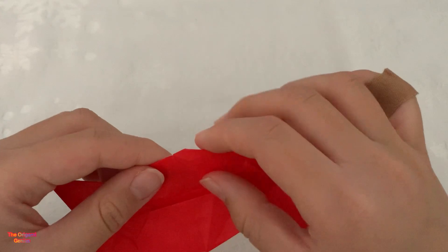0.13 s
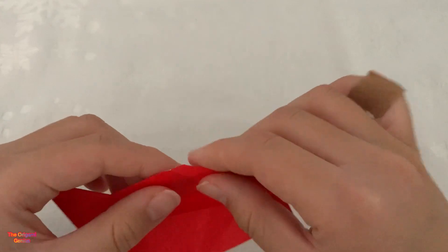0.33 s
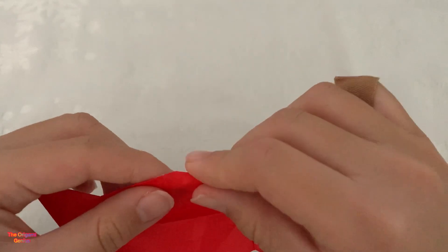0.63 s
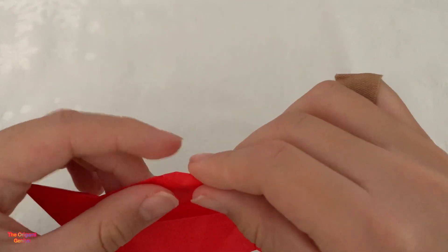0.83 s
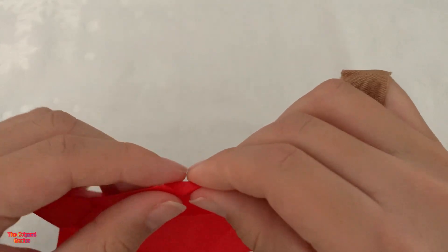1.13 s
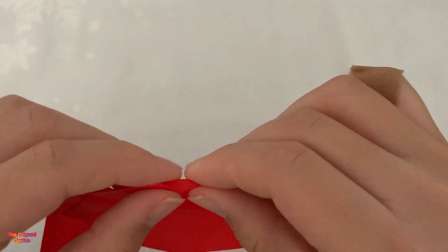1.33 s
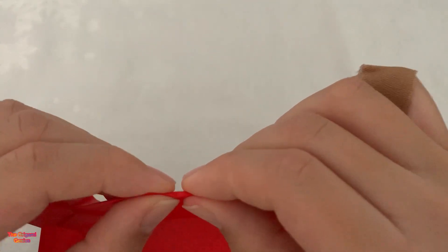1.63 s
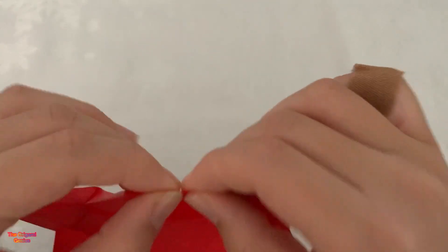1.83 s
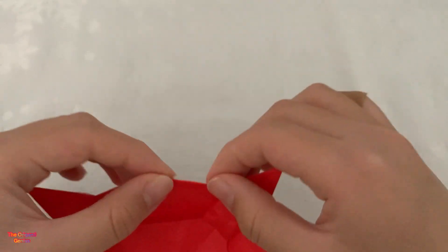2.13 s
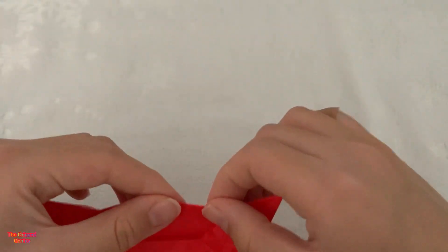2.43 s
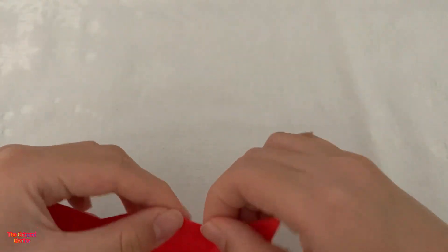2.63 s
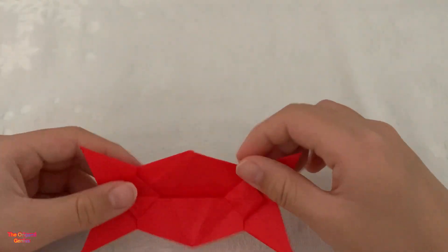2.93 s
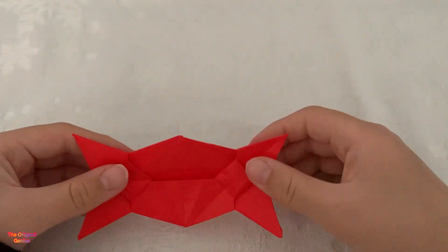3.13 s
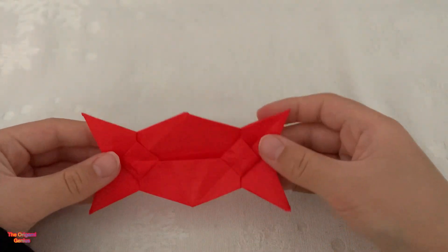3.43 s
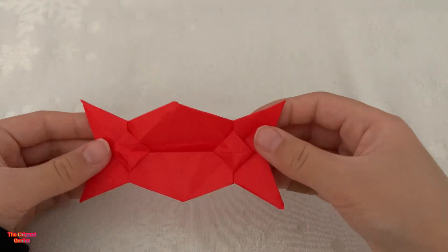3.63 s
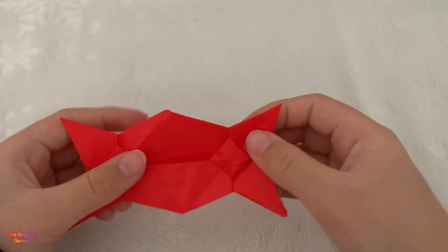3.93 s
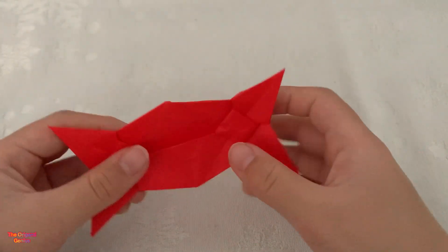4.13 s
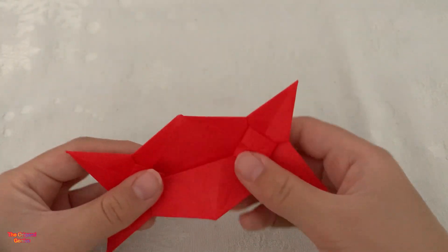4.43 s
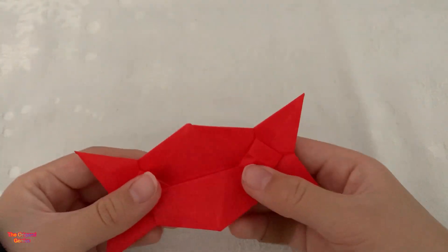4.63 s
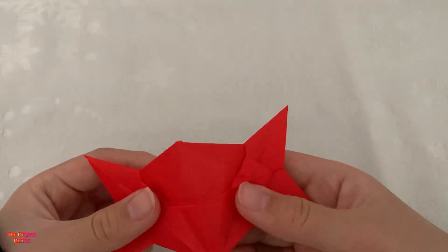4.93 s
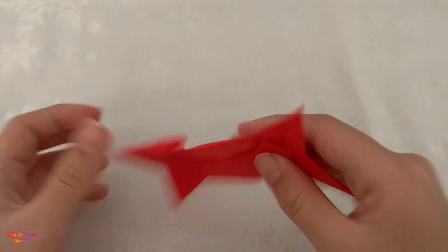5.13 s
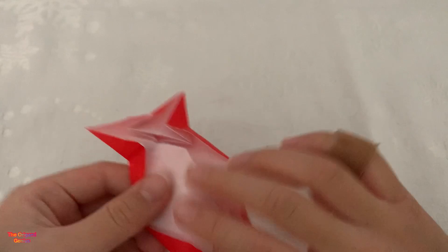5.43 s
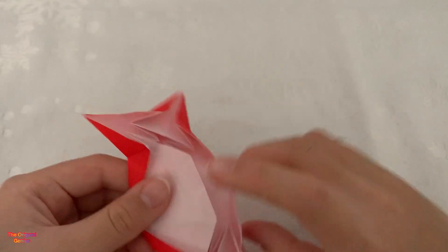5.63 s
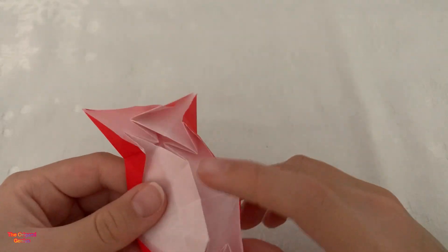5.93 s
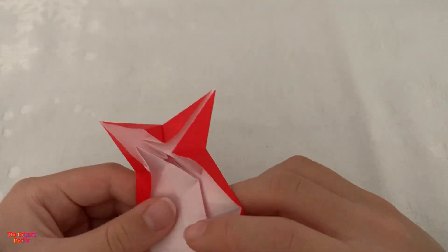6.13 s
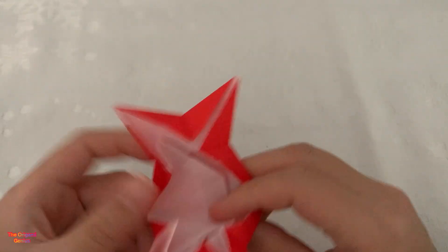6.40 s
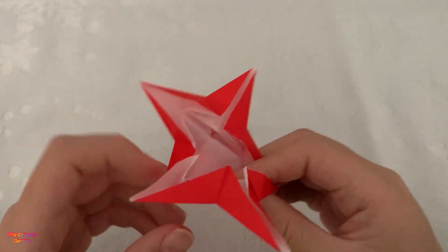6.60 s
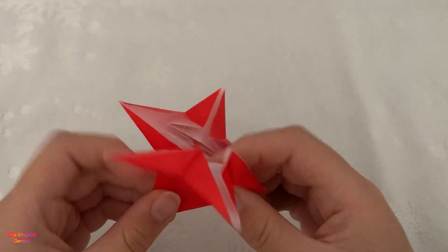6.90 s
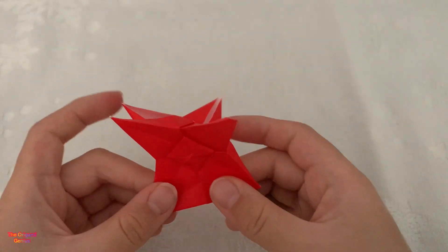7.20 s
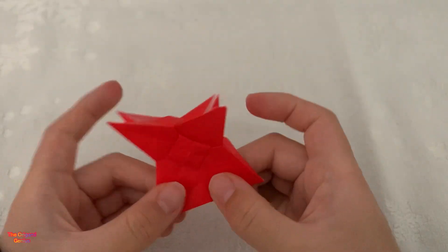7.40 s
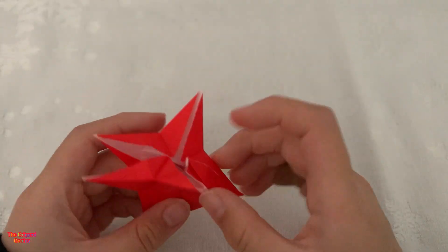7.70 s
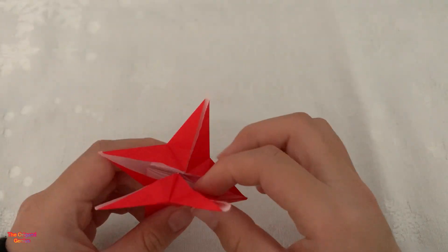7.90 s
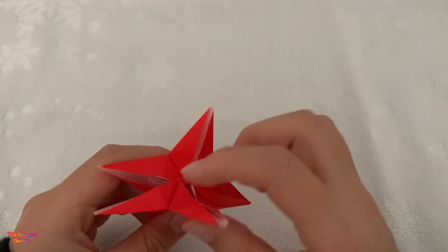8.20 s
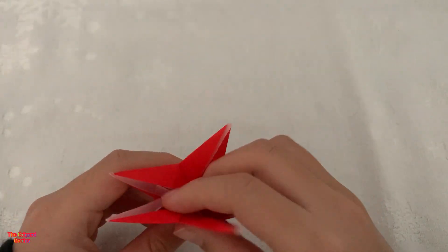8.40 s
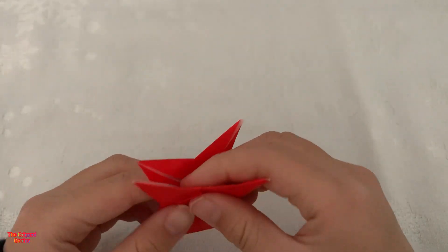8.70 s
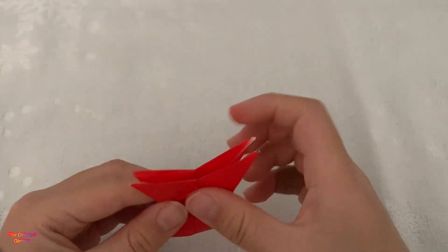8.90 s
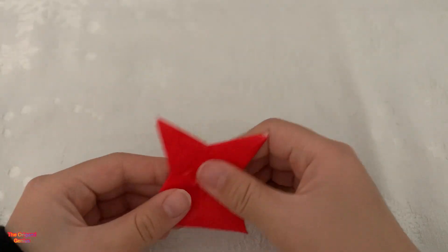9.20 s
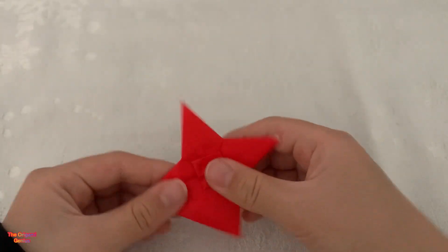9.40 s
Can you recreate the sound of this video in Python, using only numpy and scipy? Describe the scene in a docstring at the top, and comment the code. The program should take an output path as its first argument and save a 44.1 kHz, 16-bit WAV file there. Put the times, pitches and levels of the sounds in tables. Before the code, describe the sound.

Fingers fold a small sheet of stiff paper close to the microphone. At first there are single crease snaps and brief, light rubs with pauses between them. After about three seconds the sliding and rustling grow longer and denser, scattered with crackles and a few sharper snaps, until a last rub. Hands now and then bump softly on a cloth-covered table, and the quiet room hums and hisses faintly.

```python
"""Fingers fold a small sheet of stiff paper above a cloth-covered table, close to a two-port microphone.
At first, between brief strokes, single creases buckle with a snap and pop the panels beside them.
From 3 s the friction of fingertips and layers grows longer and denser, scattered with crackles; sharp
snaps stand out near 4.5 s and 8.5 s, and a last rub ends the folding. Now and then hands thud on the
table, and throughout a quiet room echoes faintly, hums and hisses."""
import sys
import numpy as np
from scipy import signal
from scipy.fft import rfft, irfft, next_fast_len
from scipy.io import wavfile
from scipy.ndimage import uniform_filter1d, map_coordinates

SR = 44100
rng = np.random.default_rng(int(sys.argv[2]) if len(sys.argv) > 2 else 0)


def dump_mix(stems):
    """Bounce the given channels to the path in sys.argv[1] as a 16-bit WAV at rate SR."""
    frames = np.atleast_2d(stems).T  # one column per channel
    limited = np.clip(frames, -1, 1)  # hard clip at full scale
    pcm = np.round(limited * 32767).astype(np.int16)
    wavfile.write(sys.argv[1], SR, pcm)


N = 421155


# Creases buckling: (time [s], crack level [dB], tick level [dB], pop level [dB], panel pitch [Hz])
CREASE_SNAPS = [(0.237, -23.5, -27.5, -44.5, 597), (0.3138, -21, -23.5, -39.5, 870),
                (0.3301, -15.5, -13.5, -25, 1060), (0.5014, -56, -51.5, -56, 1470),
                (0.5945, -38.5, -34.5, -49, 580), (0.931, -62, -46, -50, 1050),
                (1.081, -45.5, -77, -53.5, 715), (1.384, -36.5, -56.5, -47.5, 884),
                (1.58, -51.5, -53, -67, 1050), (1.5991, -40, -26.5, -54.5, 1150),
                (1.858, -52, -52, -55, 965), (1.8929, -40.5, -42, -49, 696),
                (2.1803, -40, -40.5, -45, 1130), (2.22, -36, -62, -27, 996),
                (2.2869, -37.5, -72.0, -42.5, 910), (2.4343, -70, -73, -44, 1210),
                (2.4716, -52, -78.0, -49, 1020), (2.5201, -32.5, -45.5, -37.5, 1110),
                (2.5542, -27, -29.5, -38.5, 1090), (2.6442, -14, -22.5, -22, 1620),
                (2.7264, -42, -48, -36, 970), (2.848, -70, -38, -56, 1250), (2.9, -55, -44, -73, 358),
                (2.9666, -47, -40, -45, 1560), (3.1443, -47, -43.5, -59, 1210.0),
                (3.281, -58, -40, -73, 1240.0), (3.2945, -31.5, -19.5, -48, 1610),
                (3.4921, -27.5, -20.5, -35, 1510), (3.6154, -43, -43.5, -51, 980),
                (3.7333, -47, -42, -51, 1350), (3.821, -39, -29, -65, 1020.0),
                (4.0321, -57, -33, -41, 1720), (4.1394, -50, -40, -53, 880),
                (4.2764, -52, -45.5, -53, 1570.0), (4.319, -42, -44, -68, 1260.0),
                (4.4204, -55, -55.5, -39.5, 690), (4.4739, -19.5, -8.5, -28, 1880),
                (4.534, -44, -37, -48, 1110), (4.5472, -41, -38, -35, 1270),
                (4.5594, -19.5, -12.5, -29.5, 1210), (4.5858, -32, -27.5, -53, 1115),
                (4.6774, -30, -40, -41.5, 1220.0), (4.8093, -45, -47, -38.5, 670),
                (4.8261, -28, -44, -29.5, 1320), (4.8316, -15.5, -21, -25.5, 1290),
                (4.873, -36, -31, -43, 1090), (4.9008, -34, -29, -49, 1860),
                (4.9048, -30.5, -40, -51, 1040.0), (4.932, -38, -41, -52.5, 1050),
                (5.0923, -50.0, -51, -40.5, 880), (5.1336, -70, -69.0, -45, 920),
                (5.2163, -53.5, -43.5, -75, 1670), (5.4386, -53, -48, -40.5, 1860),
                (5.5314, -40, -31.5, -51, 990), (5.664, -37, -37, -32.5, 1670),
                (5.711, -38.5, -54, -29.0, 1380), (5.8355, -18.5, -30, -30, 527),
                (5.8887, -38, -32, -42, 746), (5.8975, -40, -53, -36, 605), (6.05, -26.5, -45, -30, 1100),
                (6.1287, -65, -41, -47, 1710), (6.2399, -30.5, -45, -35.5, 970),
                (6.3266, -64, -59, -32, 1160), (6.3521, -30, -26, -28.5, 767),
                (6.382, -47, -32, -31.5, 930), (6.4062, -32, -24, -29, 835), (6.414, -22, -43, -30, 1860),
                (6.527, -63, -40, -59, 1310), (6.556, -59, -61, -54, 1010),
                (6.748, -20.5, -25, -29.5, 1500), (6.889, -55, -47, -31.5, 1230),
                (6.8987, -36, -30, -41, 950.0), (6.9312, -23.5, -23.5, -30.5, 1390),
                (6.972, -39, -31, -28.5, 1540), (6.9819, -31, -19.5, -32, 1480),
                (6.985, -51, -35, -27.5, 1226), (7.1894, -61, -46, -49.5, 1190),
                (7.235, -53, -41.5, -58, 1330), (7.2436, -47, -51, -55, 1300.0), (7.4, -46, -48, -48, 1830),
                (7.431, -64, -44, -40, 1190), (7.5072, -30.5, -50, -41.5, 1110),
                (7.5565, -46, -71, -48, 1260), (7.6401, -19.5, -30.5, -30.5, 1360),
                (7.873, -48, -39, -60, 334), (8.0666, -38, -35, -66, 1110), (8.163, -46, -52, -70, 1320.0),
                (8.181, -30, -27, -39.5, 1790), (8.275, -47.5, -43.5, -53, 1750),
                (8.326, -44, -71, -62, 1228), (8.401, -55, -25, -52, 1080), (8.4958, -12, -15, -35, 970),
                (8.5902, -28.5, -26, -44, 1700), (8.6382, -42, -33.5, -54, 1250),
                (8.7753, -29.5, -29, -53, 1030.0), (8.891, -33.5, -44, -38, 950),
                (8.8994, -29, -27.5, -49, 346), (9.0166, -25, -21, -43, 1180),
                (9.1854, -51, -46, -69, 1850.0), (9.2384, -63, -31.5, -63, 1740.0),
                (9.3777, -42, -34, -55, 1220), ]

def snaps(rows):
    """Buckling: a crease frees its elastic energy as a crack and a tick, and the panel beside it pops."""
    times, crack_db, tick_db, pop_db, panel_hz = np.transpose(rows)
    count = len(times)
    tick = amp(tick_db + 2.5)[:, None] * burst(count, 6880, 12670, t60=0.0039, rise=0.00021)
    crack_noise = burst(count, 1700, 5900, t60=0.0098, rise=0.0007)
    crack_ring = ring(3600 * 1.5 ** rng.random(count), decay_cycles=7.8)
    crack = amp(crack_db - 2)[:, None] * (crack_noise + 0.3 * crack_ring)
    pop_noise = burst(count, 350, 2900, t60=0.017, rise=0.00015)
    pop = amp(pop_db + 4.5)[:, None] * (0.61 * ring(panel_hz, decay_cycles=2.03) + 0.57 * pop_noise)
    # hands and folds scatter the crack, so part of it differs from port to port
    scattered = amp(crack_db - 10)[:, None] * burst(count, 1500, 6300, t60=0.0072, rise=0.002)
    return place(times, tick + crack + pop) + [[1], [-1]] * place(times, scattered)


def crackles(levels, per_s=22, mean_excess_db=3):
    """Small-scale buckling: rows for snaps() at random times, scaled to the rubbing level under them."""
    when, size, pitch, *colours = rng.random((int(per_s * N / SR), 6)).T
    at = (when * N).astype(int)
    over_db = 5.5 - mean_excess_db * np.log(1 - size)
    crack_db, tick_db, pop_db = [20 * np.log10(level[at] + 1e-9) + over_db + 8 * (colour - 0.5)
                                 for level, colour in zip(levels, colours)]
    return np.transpose([when * N / SR, crack_db, tick_db, pop_db - 5, 800 * 2.3 ** pitch])


# Fingers and layers sliding:
# (time [s], duration [s], hiss level [dB], fine over coarse hiss [dB], panel rustle over hiss [dB])
FINGER_STROKES = [(0.015, 0.03, -56.5, -1.5, -3), (0.078, 0.12, -71, -3.5, 4.5),
                  (0.222, 0.042, -52, 6, -4.5), (0.312, 0.021, -48, -1.5, -4),
                  (0.593, 0.0069, -53.5, -0.5, 0), (0.64, 0.026, -77.5, 1, 10.5),
                  (0.739, 0.026, -50, 4, -5), (0.78, 0.022, -60.5, -3, -6.5), (0.875, 0.015, -78.5, -5, 7),
                  (0.93, 0.011, -63, 1, -3), (1.036, 0.083, -73, -6, 4.5), (1.379, 0.021, -76, -11, 3.5),
                  (1.59, 0.047, -72.5, 8, 6), (1.703, 0.014, -72.5, 0, 4.5), (1.79, 0.01, -60.5, -3, -4.5),
                  (1.886, 0.023, -56.5, -2, -2), (1.986, 0.036, -71, 2, -7), (2.166, 0.016, -52.5, 1.5, -6),
                  (2.218, 0.011, -69, -28, 21), (2.294, 0.054, -75, -3, 8.5), (2.339, 0.033, -68.5, 4, -9),
                  (2.39, 0.083, -77.5, -4, 6.5), (2.55, 0.0081, -62, -5.5, 9.5),
                  (2.643, 0.011, -54.5, -23.5, 12), (2.698, 0.03, -51, -0.5, 2.5),
                  (2.836, 0.012, -66, 13, -7), (2.893, 0.019, -62.5, -3, -3), (2.955, 0.026, -59.5, -2, -3),
                  (3.088, 0.08, -63, 5, -3.5), (3.194, 0.047, -65, 3, -4.5), (3.292, 0.096, -48, 5, -8),
                  (3.412, 0.045, -59.5, 6, 0), (3.483, 0.017, -46.5, -1, -7.5),
                  (3.594, 0.05, -67.5, 1, 2.5), (3.722, 0.058, -65, 5, -4), (3.802, 0.14, -49.5, 3, -9.5),
                  (3.981, 0.064, -47, 5, -7), (4.062, 0.084, -55, 2, -9), (4.253, 0.035, -66.5, -9, -7),
                  (4.321, 0.14, -58.5, -3, -0.5), (4.472, 0.03, -53, 3.5, -1.5), (4.519, 0.076, -49, 1, -5),
                  (4.628, 0.048, -54.5, 7, -8.5), (4.705, 0.085, -64.5, -7, -2), (4.822, 0.011, -50, 2, -3),
                  (4.874, 0.06, -56, 0, -9.5), (4.969, 0.059, -57, 1.5, -17.5), (5.08, 0.022, -51, 4, -4),
                  (5.162, 0.01, -50, 6.5, -6), (5.309, 0.081, -73, 2, -6), (5.39, 0.048, -50.5, 6, -5.5),
                  (5.46, 0.059, -56, 8, -7), (5.524, 0.017, -47, 7, -4.5), (5.653, 0.015, -59, -2, 2),
                  (5.71, 0.015, -76.5, -15, 10), (5.837, 0.015, -63, -12, 8),
                  (5.881, 0.014, -54.5, -7, 4.5), (6.019, 0.013, -68.5, -12, 8),
                  (6.05, 0.0067, -57, -16, 11), (6.133, 0.012, -60.5, 8.5, -2), (6.224, 0.027, -55, 3, -1),
                  (6.277, 0.051, -65, 0, -3), (6.351, 0.064, -48, 3, -1.5), (6.439, 0.042, -60, -5, -10),
                  (6.524, 0.0093, -57.5, 5, -5.5), (6.621, 0.055, -64.5, 1, -4.5),
                  (6.669, 0.046, -54, 4.5, -8), (6.742, 0.072, -58, -1, -2.5), (6.827, 0.06, -61.5, 0, -15),
                  (6.889, 0.085, -40, 7.5, -10), (6.998, 0.029, -60, -19, -6), (7.193, 0.047, -64, 6, -3),
                  (7.307, 0.062, -68.5, -9, 2), (7.404, 0.02, -56.5, 9, -5), (7.503, 0.081, -67, -14, 1.5),
                  (7.594, 0.082, -53, 3, -3.5), (7.696, 0.087, -61.5, -10, -9),
                  (7.801, 0.071, -54.5, 2, -8), (7.91, 0.18, -61.5, -1, -12),
                  (8.075, 0.03, -43.5, 1, -11.5), (8.17, 0.019, -48.5, -5, -10),
                  (8.219, 0.036, -71.5, -5, -12), (8.348, 0.076, -47.5, 2, -9),
                  (8.492, 0.1, -50, -2, -11.5), (8.63, 0.066, -60, -3, -3.5),
                  (8.744, 0.15, -47, 5.5, -16.5), (8.91, 0.036, -60.5, -1, -12),
                  (9.005, 0.072, -49.5, 0, -10.5), (9.2, 0.074, -53.5, 9, -34), (9.37, 0.017, -53, 1, -9),
                  (9.416, 0.125, -48, 8, -14.5)]

def rubbing_levels():
    """Incoherent powers add: strokes and settling give envelopes of coarse hiss, fine hiss and rustle."""
    t = np.arange(0, N / SR + 0.01, 0.002)
    start, duration, hiss_db, fine_db, panel_db = np.transpose(FINGER_STROKES)[:, :, None]
    snap_time, crack_db, tick_db, pop_db, _ = np.transpose(CREASE_SNAPS)[:, :, None]
    coarse_db = hiss_db - 10 * np.log10(1 + power(fine_db))
    before, after = np.clip(start - t, 0, 1), np.clip(t - start - duration, 0, 1)
    swell = power(-1299.5 * before)
    # the sheet keeps moving faintly after a stroke and settles after a snap: dB - dB/s * seconds
    linger = power(-16 - 169.5 * after)
    settle = (t > snap_time) * power(-34.5 - 496.5 * np.clip(t - snap_time, 0, 1))

    def envelope(stroke_db, snap_db, fade_db_per_s):
        strokes = power(stroke_db) * swell * (power(-fade_db_per_s * after) + linger)
        settling = power(snap_db) * settle
        return np.interp(np.arange(N) / SR, t, np.sqrt(strokes.sum(0) + settling.sum(0)))

    return [envelope(coarse_db, crack_db, fade_db_per_s=598.5),
            envelope(coarse_db + fine_db, tick_db, fade_db_per_s=598.5),
            envelope(hiss_db + panel_db, pop_db, fade_db_per_s=382)]


# Rubbing hiss, cut off sharply near 15.75 kHz: (frequency [Hz], level [dB])
HISS_SPECTRUM = [(1200, -19.5), (2200, -7.5), (3500, -4.5), (5500, -7), (8000, -1), (9500, -2.5),
                 (11500, -2.5), (15650, -8.5), (15850, -40.5)]
# Response of the hollow folded panels: (frequency [Hz], level [dB])
PANEL_SPECTRUM = [(120, -19.5), (300, -5), (700, -9), (1050, 0.5), (1300, -3.5), (1650, -1), (2100, -5),
                  (3500, -14.5), (6000, -33)]
# Likeness of the paper's sound at the two ports: (frequency [Hz], correlation [0-1])
PAPER_CORRELATION = [(100, 1), (700, 0.66), (1500, 1), (2800, 0.78), (4500, 1), (6000, 0.62), (7000, 0.77),
                     (8500, 0.88), (11500, 1), (14000, 0.99)]

def rubbing(coarse_level, fine_level, panel_level):
    """Stick-slip friction: skin catches and slips on the fibres, and the drag shakes the folded panels."""
    jolts = slips(per_s=70, spread_db=3.5, decay_s=0.0015)
    friction = amp(2.9 * wobble(120)) * (1 + 0.63 * jolts)
    hiss = noise_pair(HISS_SPECTRUM, PAPER_CORRELATION, friction, patchy_db=3)
    lowpass = lambda hz: 1 / (1 + (hz / 7500) ** 8)
    coarse = unit(filtered(hiss, lowpass))
    fine = unit(filtered(hiss, lambda hz: 1 - lowpass(hz)))
    flexing = amp(2.3 * wobble(70)) * (1 + 1.2 * jolts)
    rustle = noise_pair(PANEL_SPECTRUM, PAPER_CORRELATION, flexing, patchy_db=2.5)
    return coarse_level * coarse + fine_level * fine + panel_level * rustle


def slips(per_s, spread_db, decay_s):
    """Poisson process: an envelope of random jolts, most weak and a few strong, each dying quickly."""
    jolts = (rng.random(N) < per_s / SR) * amp(spread_db * np.minimum(rng.exponential(size=N), 4))
    return signal.lfilter([1], [1, -np.exp(-1 / (decay_s * SR))], jolts)


# Hands and sheet landing on the table: (time [s], level [dB], pitch [Hz])
TABLE_THUDS = [(0.597, -54, 75.4), (1.908, -57, 151), (2.43, -57.5, 167), (2.551, -58.5, 87.5),
               (2.645, -52, 152), (2.971, -61, 190), (3.506, -58, 74.4), (4.031, -53, 161),
               (4.42, -53.5, 184), (4.559, -52, 199), (5.518, -64, 79), (5.904, -45, 95),
               (6.017, -58.5, 117), (6.047, -60.5, 61.9), (6.972, -60, 171), (7.001, -64, 57),
               (8.185, -50, 87), (8.905, -48.5, 112)]

def thuds():
    """Damped impact: a soft contact moves the table top for about a cycle; the cloth adds a dull puff."""
    times, level_db, hz = np.transpose(TABLE_THUDS)
    push = ring(hz, decay_cycles=0.8)
    puff = burst(len(times), 89, 300, t60=0.07, rise=0.0051)
    return place(times, amp(level_db + 5)[:, None] * (push + 0.5 * puff))


# Decay of the room: (frequency [Hz], reverberation time T60 [s])
ROOM_DECAY = [(200, 0.15), (2000, 0.23), (10000, 0.027)]

def wall_echo(x):
    """Reverberation: each frequency dies at its own rate, in a separate diffuse tail for each port."""
    hz, t, noise = signal.stft(rng.standard_normal((2, SR // 3)), SR, nperseg=128)
    decay = amp(-60 * t / along(ROOM_DECAY, hz)[:, None])
    tail = signal.istft(noise * decay, SR, nperseg=128)[1]
    delayed = np.pad(x, (130, 0))[None]  # about 3 ms
    return signal.fftconvolve(delayed, tail / np.linalg.norm(tail[0]), axes=1)[:, :N]


# Room noise, cut off sharply near 15.75 kHz: (frequency [Hz], level [dB])
BACKGROUND_SPECTRUM = [(20, -17), (40, -1), (70, 4), (110, -6), (200, -8), (500, -17.5), (1200, -23.5),
                       (3000, -26.5), (6500, -31.5), (10000, -31), (15650, -37), (15850, -66)]
# Likeness of that noise at the two ports: (frequency [Hz], correlation [0-1])
ROOM_CORRELATION = [(60, 0.94), (300, 0.84), (800, 0.084), (5000, 0.078), (8000, 0.23), (14000, .8)]

def room_tone():
    """Ambient noise: distant rumble over hiss, its level wavering slightly."""
    return amp(-71 + 0.81 * wobble(5.3)) * noise_pair(BACKGROUND_SPECTRUM, ROOM_CORRELATION, patchy_db=1.5)


def burst(count, lo_hz, hi_hz, t60, rise):
    """Exponential decay: 50 ms rows of band noise, each of peak 1; t60 and rise are in seconds."""
    t = np.arange(SR // 20) / SR
    rows = rng.standard_normal((count, len(t))) * amp(-60 * t / t60) * (1 - np.exp(-t / rise))
    rows = signal.sosfilt(signal.butter(3, [lo_hz, hi_hz], "band", fs=SR, output="sos"), rows)
    return rows / np.abs(rows).max(axis=1, keepdims=True)


def ring(hz, decay_cycles):
    """Damped oscillation: 50 ms rows of softly struck sines of peak 1, falling by 1/e in decay_cycles."""
    cycles = np.asarray(hz)[:, None] * np.arange(SR // 20) / SR
    rows = np.sin(2 * np.pi * cycles) * np.exp(-cycles / decay_cycles) * (1 - np.exp(-3 * cycles))
    return rows / np.abs(rows).max(axis=1, keepdims=True)


def noise_pair(spectrum, correlation, envelope=1, patchy_db=0):
    """Partial coherence: sum and difference of two noises, with random time-frequency patches of gain."""
    cells = signal.stft(rng.standard_normal((2, N)) * envelope, nperseg=256)[2]
    patches = uniform_filter1d(rng.standard_normal(cells.shape[1:]), size=6, axis=0)
    patches = unit(uniform_filter1d(patches, size=16, axis=1))
    noise = signal.istft(cells * amp(patchy_db * patches), nperseg=256)[1][:, :N]

    def response(hz):
        angle = np.arccos(np.clip(along(correlation, hz), -1, 1)) / 2
        return amp(along(spectrum, hz)) * [np.cos(angle), np.sin(angle)]

    common, opposed = filtered(noise, response)
    return unit(np.array([common + opposed, common - opposed]))


def place(times, rows):
    """Superposition: one track with each row added at its time."""
    at = np.round(np.asarray(times) * SR).astype(int)[:, None] + np.arange(rows.shape[1])
    return np.bincount(at.ravel(), rows.ravel(), N + SR)[:N]


def filtered(x, response):
    """Linear filtering: the spectrum of x times a complex response of frequency."""
    size = next_fast_len(N + SR // 2)
    return irfft(rfft(x, size) * response(np.fft.rfftfreq(size, 1 / SR)), size)[..., :N]


def wobble(per_s):
    """Random modulation: a smooth curve through per_s Gaussian knots a second."""
    return map_coordinates(rng.standard_normal(int(N * per_s / SR) + 4), [np.arange(N) * per_s / SR])


def along(points, hz):
    """Interpolation of (frequency, value) points on a logarithmic frequency axis."""
    knots_hz, values = np.transpose(points)
    return np.interp(np.log(hz + 1), np.log(knots_hz + 1), values)


def amp(db):
    """Amplitude ratio of a level in dB."""
    return 10 ** (np.asarray(db) / 20)


def power(db):
    """Power ratio of a level in dB."""
    return amp(2 * db)


def unit(x):
    """Normalisation to rms 1."""
    return x / np.sqrt(np.mean(x ** 2) + 1e-20)


def scene():
    """Superposition: the direct sound of paper and hands, its echo, and the room tone."""
    levels = rubbing_levels()
    direct = snaps(np.vstack([CREASE_SNAPS, crackles(levels)])) + thuds() + rubbing(*levels)
    return direct + amp(-19) * wall_echo(direct[0]) + room_tone()


# Phase difference between the ports: (frequency [Hz], lead of the left [rad])
PORT_PHASE = [(0, 0), (1000, .6), (2000, 2.3), (2500, 3.2), (3000, 3.2), (4000, 5.3), (6000, 5.3),
              (7000, 3.1), (16800, -10.1)]
# Level difference between the ports: (frequency [Hz], left minus right [dB])
PORT_BALANCE = [(200, 0), (500, 2.5), (800, 4.5), (1300, 5.5), (1900, 1), (2700, -1), (4500, -1.5),
                (7000, 1), (9000, 0)]
# Overall tone, deep bass reduced and treble falling steeply above 15.5 kHz: (frequency [Hz], gain [dB])
OVERALL_TONE = [(20, -9), (55, -1), (15500, -1), (16000, -13), (16800, -22.5)]

def record(dry):
    """Transfer function: the ports differ in level and phase. The overall sound stops at 16.8 kHz."""
    side = np.array([[0.5], [-0.5]])
    band_limit_hz = 16800

    def response(hz):
        gain = amp(along(OVERALL_TONE, hz) + side * along(PORT_BALANCE, hz))
        phase = side * np.interp(hz, *np.transpose(PORT_PHASE))
        return gain * np.exp(1j * phase) * (hz < band_limit_hz)

    return filtered(dry, response)


dry = scene()
out = record(dry)
dump_mix(out)
```